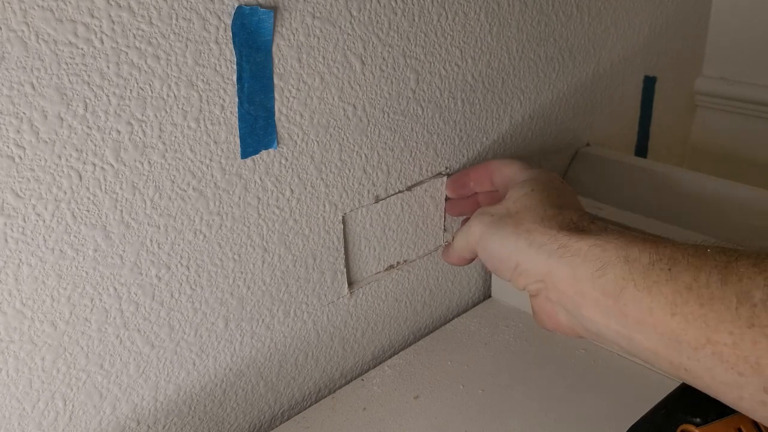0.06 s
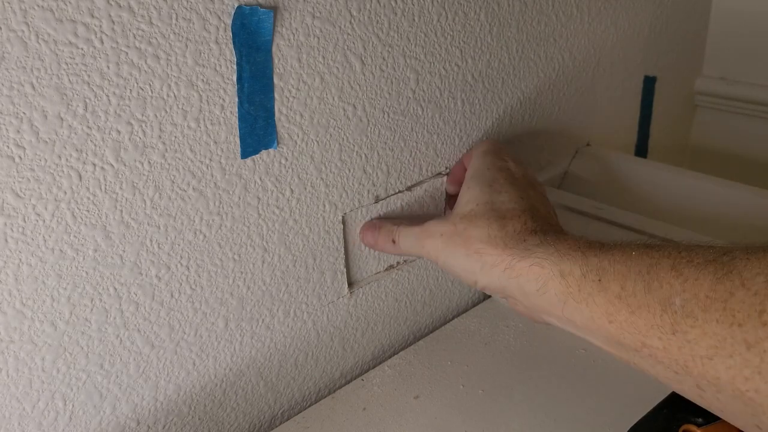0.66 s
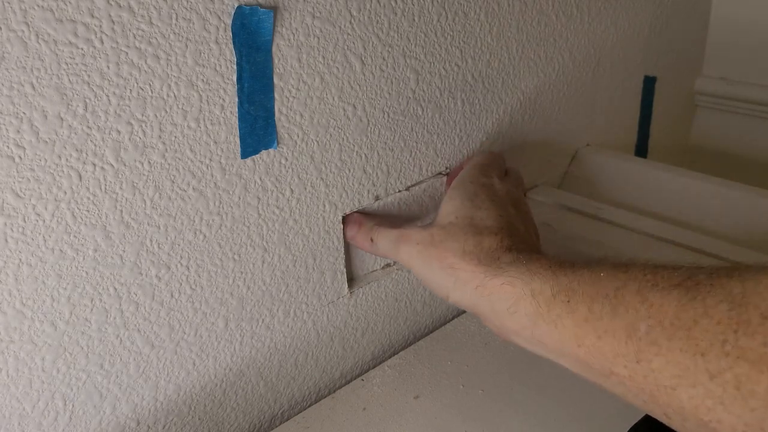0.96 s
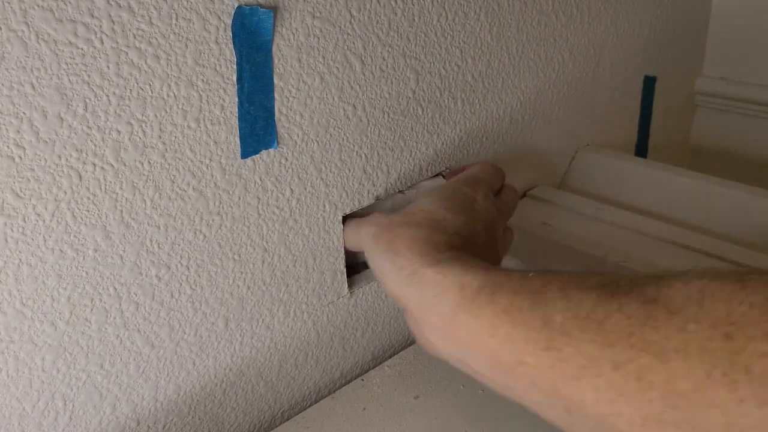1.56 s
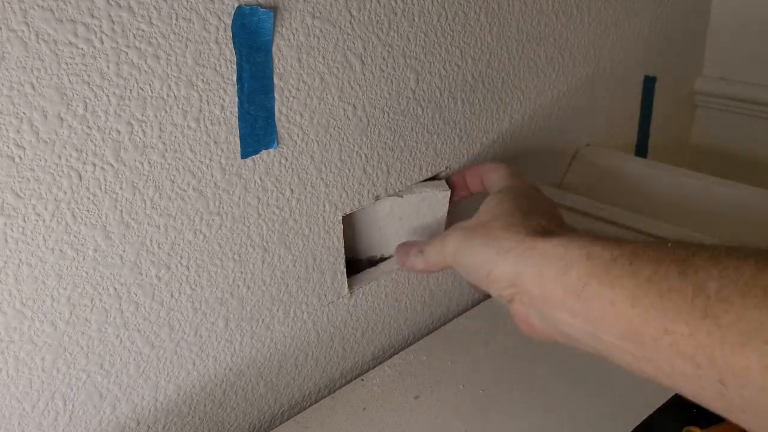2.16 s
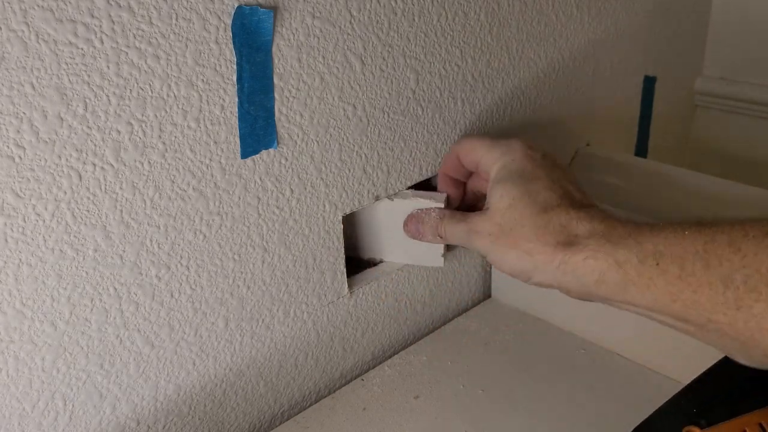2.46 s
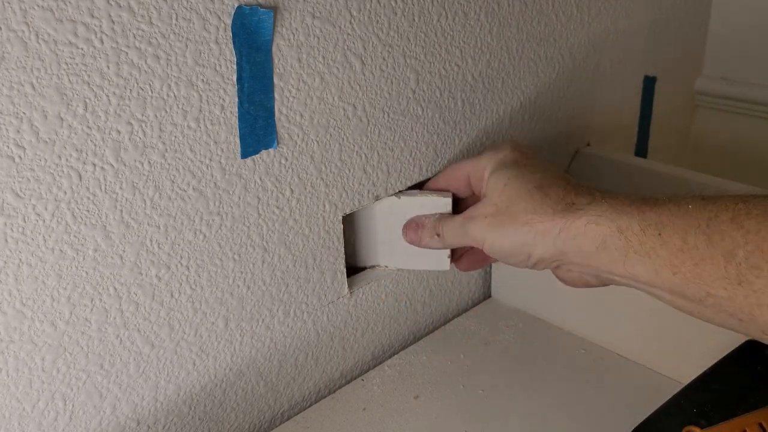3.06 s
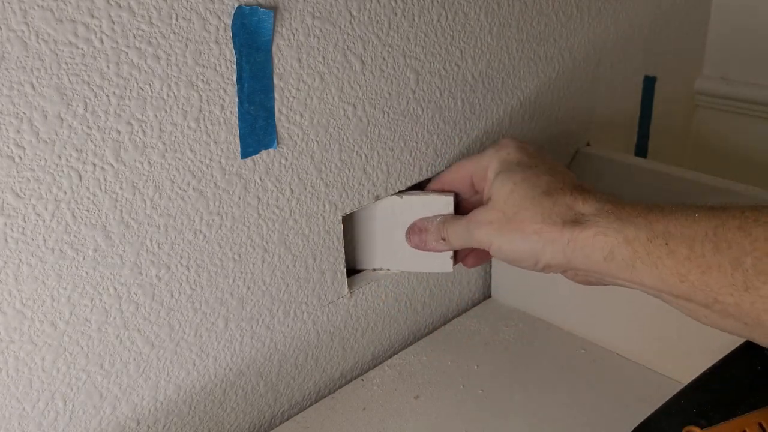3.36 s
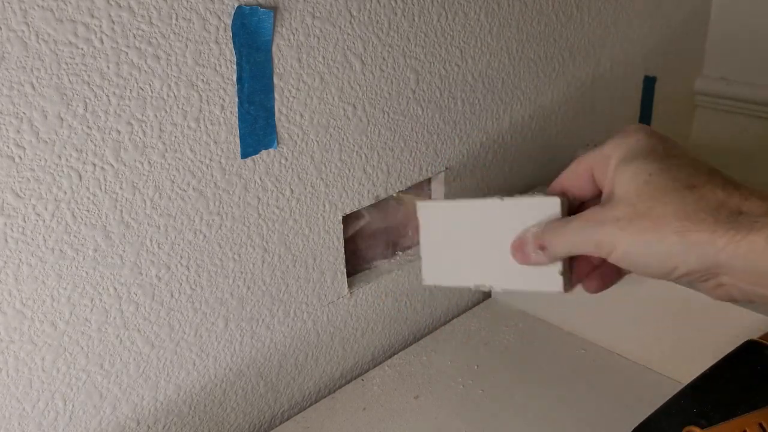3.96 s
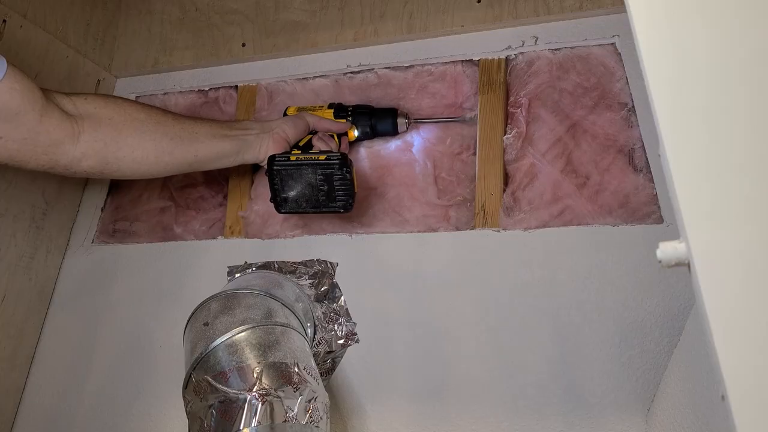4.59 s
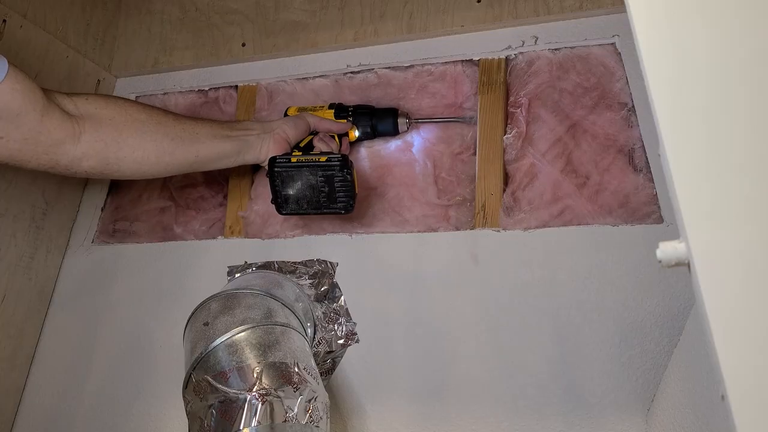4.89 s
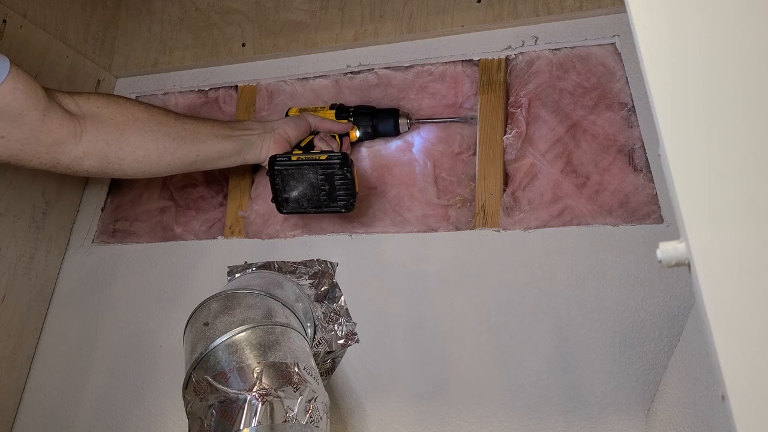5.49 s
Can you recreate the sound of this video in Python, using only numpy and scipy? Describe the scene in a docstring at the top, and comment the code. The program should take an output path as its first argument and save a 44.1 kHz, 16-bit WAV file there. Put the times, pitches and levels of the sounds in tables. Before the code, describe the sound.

Heard up close in a small room, a piece of drywall is worked out of a hollow wall. Soft, dull finger pats come first, then irregular knocks, gritty scrapes and bright ticks of breaking crumbs over a faint mains hum. The loosened piece drags out with a last, lighter scrape. The sound then switches abruptly to a cordless drill running quietly, with whining gears and rushing air.

```python
"""A small room with a faint mains hum, a stereo microphone close to a hollow wall. Fingertips pat and rub a cut
piece of drywall. From 1 s it is rocked and pried by hand: it knocks on the rim of its hole, and its gypsum
edges scrape, crunch and shed crumbs. At 2.7 s it comes loose and sounds lighter, then slides free. At 4.4 s the
scene changes and the hum stops: a cordless drill runs, quiet, steady and dry: whining gears, a shuddering chuck
and rushing cooling air."""
import sys
import numpy as np
from scipy import signal
from scipy.fft import rfft, irfft, next_fast_len
from scipy.io import wavfile
from scipy.ndimage import map_coordinates

SR = 44100
rng = np.random.default_rng(int(sys.argv[2]) if len(sys.argv) > 2 else 0)


def persist_wave(psi):
    """Save psi, clipped to +-1, as 16-bit WAV."""
    counts = np.round(np.clip(psi, -1, 1) * 32767).astype(np.int16)
    wavfile.write(sys.argv[1], SR, np.atleast_2d(counts).T)


N = 244114

MAINS_HUM = [(59.2, -55), (118.5, -77.5), (237, -76)]  # partials of the hum: f/Hz, level/dB
ROOM_AIR = [(20, -20.5), (65, -5), (110, -10.5), (220, -14.5), (400, -24.5), (1200, -29), (2200, -38.5),
            (4000, -42), (8000, -55.5), (15000, -56)]  # spectrum of the quiet room: f/Hz, level/dB
COHERENCE = [(150, 0.93), (550, 0.68), (5000, 0), (15000, 0)]  # diffuse sound at the microphone: f/Hz, left-right likeness/0..1
FINGER_TAPS = [(0.004, -41, 285), (0.077, -40, 316), (0.233, -38.5, 253), (0.295, -40, 295),
               (0.448, -43.5, 288), (0.508, -46, 207), (0.588, -41, 239)]  # fingertips pat the piece: t/s, level/dB, ring f/Hz
FINGER_RUBS = [(0.672, 0.025, -65), (0.748, 0.037, -62), (0.822, .036, -69.5), (0.934, 0.052, -66.5),
               (1.277, 0.036, -59), (1.335, 0.083, -65.5), (1.418, 0.32, -63), (1.748, 0.087, -52),
               (1.977, 0.049, -59), (3.156, 0.078, -65), (3.408, 0.038, -51.5)]  # skin slides on the paper face: t/s, length/s, level/dB
# balance of a tap and of a rub: wall/dB, board/dB, edge/dB, powder/dB
TAP_BALANCE = (-6.5, -13.5, -24, -40)
RUB_BALANCE = (0, 1.5, 0.5, -1.5)
# the piece hits the rim: t/s, level/dB, relative thud/dB, relative crunch/dB, ring f/Hz
RIM_KNOCKS = [(0.997, -26, -9, -7, 585), (1.015, -18.5, -5, -7, 326), (1.125, -40, 1, -12, 450),
              (1.231, -45, 8, -39, 304), (1.532, -25.5, -8.5, -6.5, 1113), (1.591, -25.5, -2, -15, 457),
              (1.798, -31, 7.5, -8, 182), (2.032, -28, 9.5, -13, 313), (2.123, -37, 12, -3, 110.4),
              (2.181, -31, 7, -29, 129), (2.225, -37.5, 9, -26, 207), (2.479, -21.5, -6, -11, 624),
              (2.868, -32.5, 14.5, -17.5, 310), (3.279, -37, 1, -2.5, 954), (3.299, -30.5, 0.5, -4.5, 287),
              (3.76, -27.5, -7, -10, 618), (3.941, -32.5, 1, -4, 139)]
EDGE_SCRAPES = [(1.016, 0.061, -43, -2.5), (1.614, 0.068, -31.5, -1.5), (2.107, 0.028, -39, -5.5),
                (2.158, 0.039, -30, -14.5), (2.448, 0.068, -39.5, -4.5), (2.565, 0.045, -43, -4),
                (2.652, 0.041, -39, -8), (2.834, 0.14, -42, -6), (3.026, 0.032, -45, -7),
                (3.489, 0.038, -49, -6.5), (3.561, 0.14, -43, -7), (3.725, 0.257, -40.5, -2.5),
                (3.749, .056, -23, -11.5), (3.974, 0.1, -49, -1), (4.081, 0.057, -38, 0.5)]  # the edge drags: t/s, length/s, level/dB, relative crunch/dB
CRUMB_SNAPS = [(1.0632, -33), (1.6365, -18), (1.7515, -32), (3.218, -60), (3.4285, -36), (4.026, -30.5)]  # single gypsum crumbs break: t/s, level/dB
# resonances of the hollow wall, the cut board and its gypsum edge: f/Hz, width/Hz, level/dB
WALL_MODES = [(57.3, 22, -2), (83, 29, 3), (134, 40, -3.5), (193, 67, -2), (245, 67, 3), (298, 31, -0.5)]
BOARD_MODES = [(406, 77, -1), (513, 70, 0), (647, 77, 1.5), (860, 51, -3), (1010, 61, 0), (1166, 90, -2),
               (1298, 113, -4.5)]
EDGE_MODES = [(1697, 334, -1), (2310, 153, -1), (2424, 144, 0.5), (2730, 225, 0), (3100, 218, -2),
              (3860, 260, -5)]
POWDER_HISS = [(1500, -39), (3500, 0), (4500, 0.5), (5600, 0.5), (7400, -1), (9000, -10), (12000, -7),
               (15500, -10)]  # spectrum of gypsum powder: f/Hz, level/dB
LOOSE_COLOUR = [(70, -6.5), (130, -2), (270, -0.5), (390, -4), (600, 1.05), (1500, -0.5)]  # the freed piece drives the deepest modes less: f/Hz, gain/dB
ROOM_DECAY = [(80, 0.52), (400, 0.63), (1300, 0.59), (4000, 0.58), (12000, 0.3)]  # reverberation time: f/Hz, t60/s
ROOM_COLOUR = [(30, -10), (90, 4), (250, -0.5), (450, -2), (1300, -2), (2500, -1.5), (8000, -1.5)]  # colour of the room's ring: f/Hz, gain/dB
SIDE_COLOUR = [(80, -21.5), (700, -7), (2400, 0), (9000, 0)]  # side signal at the microphone: f/Hz, gain/dB
WHINE_PITCH = [(4.44, 2560), (4.5, 2504), (4.6, 2545), (4.72, 2522), (4.92, 2531), (5.1, 2630),
               (5.25, 2683), (5.4, 2628), (5.54, 2618)]  # tooth rate of the drill's gears: t/s, f/Hz
DRILL_LEVELS = [(4.47, -48, -48, -55.5), (4.9, -51.5, -48.5, -55), (5.15, -58, -49, -59),
                (5.535, -51, -49, -58)]  # the drill's three layers: t/s, shudder/dB, rush/dB, whine/dB
GEAR_ORDERS = [(5, -7.5), (7, 1.5), (11, -4.5), (12, -3), (23, -10.5)]  # partials of the whine: motor order, level/dB
CHUCK_ORDERS = [(2, 6.5), (3, 6.5), (4, 5.5), (5, -0.5), (6, -2.5)]  # partials of the shudder: chuck order, level/dB
VENT_AIR = [(40, -12), (80, -11), (330, -3.5), (600, -9.5), (900, -10), (1500, -15.5), (2800, -17.5),
            (4400, -18.5), (8500, -24), (15800, -32.5)]  # spectrum of the cooling air: f/Hz, level/dB
CASE_MODES = [(740, 52, 3.5), (873, 58, 5), (1085, 40, 4.5), (4120, 810, -15), (8260, 980, -23)]  # resonances of the drill's case: f/Hz, width/Hz, level/dB

LOOSE_S, DRILL_ON_S = 2.7, 4.438
LEAD_S = 0.015  # a contact creeps in this long before it takes hold
ATTACK_S, RELEASE_S, SWELL_DB = 0.016, 0.017, -1  # pressure of a stroke: onset, release, change along it
CAVITY_DB, CAVITY_T60_S = -6, 0.16
POWDER_PER_CRUNCH = 1.56  # dB per dB: the hiss of powder grows faster than the crunch
KNOCK_POWDER_DB, SCRAPE_POWDER_DB, SCRAPE_THUD_DB = -5, -1.5, 0.5  # relative to the contact's level
BAND_LIMIT_HZ = 15950


def amp(db):
    """Decibels to gain."""
    return 10 ** (np.asarray(db) / 20)


def unit(x):
    """x scaled to rms 1."""
    return x / np.sqrt(np.mean(x ** 2) + 1e-20)


def along(points, hz):
    """(f/Hz, value) points interpolated on a log frequency axis."""
    freqs, values = np.transpose(points)
    return np.interp(np.log(hz + 1), np.log(freqs + 1), values)


def curves(rows):
    """One value per sample for each column after the time."""
    times, *columns = np.transpose(rows)
    return [np.interp(np.arange(N) / SR, times, column) for column in columns]


def wobble(rate, size=N):
    """A smooth random curve, rate knots a second."""
    knots = rng.standard_normal(int(size * rate / SR) + 4)
    return map_coordinates(knots, [np.arange(size) * rate / SR])


def add(track, start, sound):
    """Mix a sound in at start seconds."""
    part = track[max(round(start * SR), 0):][:len(sound)]
    part += sound[:len(part)]


def filtered(x, response):
    """x through a complex frequency response."""
    size = x.shape[-1]
    padded = next_fast_len(size + SR // 10)
    hz = np.fft.rfftfreq(padded, 1 / SR)
    return irfft(rfft(x, padded) * response(hz), padded)[..., :size]


def colour(x, spectrum):
    """x shaped by a smooth (f/Hz, gain/dB) curve."""
    return filtered(x, lambda hz: amp(along(spectrum, hz)))


def resonate(x, modes):
    """x through a bank of resonances with steep skirts and alternating signs."""
    def peak(hz, centre, width):
        return 1j * hz * width / (centre ** 2 - hz ** 2 + 1j * hz * width)
    return filtered(x, lambda hz: sum(
        (-1) ** k * amp(db) * peak(hz, centre, width) * peak(hz, centre, centre)
        for k, (centre, width, db) in enumerate(modes)))


def diffuse_noise():
    """White noise from all around the microphone: left and right alike in the bass only."""
    def mid_side_gains(hz):
        angle = np.arccos(np.clip(along(COHERENCE, hz), -1, 1)) / 2
        return np.array([np.cos(angle), np.sin(angle)])
    mid, side = filtered(rng.standard_normal((2, N)), mid_side_gains)
    return np.array([mid + side, mid - side])


def room_tone():
    """Mains hum in the centre, over faint air noise."""
    t = np.arange(N) / SR
    hum = sum(amp(db + .8 * wobble(4)) * np.sqrt(2) * np.sin(2 * np.pi * hz * t) for hz, db in MAINS_HUM)
    return hum + amp(-58) * unit(colour(diffuse_noise(), ROOM_AIR))


def grit(t, rate, spread_db):
    """Random tiny fractures, rate a second, of uneven size."""
    breaks = rng.random(len(t)) < rate / SR
    return unit(breaks * rng.standard_normal(len(t)) * amp(spread_db * rng.standard_normal(len(t))))


def blow(ring_hz, chatter_t60, chatter=0.29, ring=0.094, ring_t60=0.043, rise_s=0.016):
    """The edge starts to crumble, gives with one push and chatters on; the wedged piece rings."""
    t = np.arange(-round(LEAD_S * SR), SR // 4) / SR
    after = np.maximum(t, 0)
    envelope = amp(-60 * np.maximum(t / chatter_t60, -t / rise_s))
    crumbling = chatter * grit(t, rate=7000, spread_db=1.0) * envelope
    push = t == 0
    ringing = ring * np.sin(2 * np.pi * ring_hz * after) * amp(-60 * after / ring_t60)
    return crumbling + push + ringing


def scatter(x, size=1024, t60=0.017):
    """x through short, dense reflections that change from moment to moment."""
    out = np.zeros(len(x))
    window = signal.get_window("hann", size) ** .5
    for i in range(0, len(x) - size, size // 2):
        ring = rng.standard_normal(size) * amp(-60 * np.arange(size) / SR / t60)
        add(out, i / SR, signal.fftconvolve(x[i:i + size] * window, ring / np.linalg.norm(ring)))
    return out


def cavity(force):
    """A push on the wall and its boom in the hollow behind."""
    t = np.arange(len(force)) / SR
    boom = rng.standard_normal(len(t)) * amp(-60 * t / CAVITY_T60_S)
    return force + amp(CAVITY_DB) * signal.fftconvolve(force, boom / np.linalg.norm(boom))[:len(t)]


def drywall(force, levels_db, seconds):
    """A force drives wall, board, edge and powder, each with the energy of its level held for seconds."""
    contact = force + 2.0 * scatter(force)  # the high modes change as the contact point moves
    wall = resonate(cavity(force), WALL_MODES)
    board = resonate(force, BOARD_MODES)
    edge = resonate(contact, EDGE_MODES)
    powder = colour(contact, POWDER_HISS)
    parts = zip(levels_db, (wall, board, edge, powder))
    return sum(amp(db) * part / np.linalg.norm(part) for db, part in parts) * np.sqrt(seconds * SR)


def taps():
    """Soft fingertips give dull, light pats."""
    out = np.zeros(N)
    for start, db, ring_hz in FINGER_TAPS:
        force = blow(ring_hz, chatter_t60=0.058, ring=0.26)
        add(out, start - LEAD_S, drywall(force, db + np.array(TAP_BALANCE), seconds=0.014))
    return out


def stroke(length, levels_db, slip_db):
    """Pressure comes on, sags and lets go; the contact sticks and slips, shearing off grains in clumps."""
    t = np.arange(-round(LEAD_S * SR), int((length + RELEASE_S + .2) * SR)) / SR
    attack = .5 + .5 * np.tanh(2 * t / ATTACK_S - 1)
    release = np.clip((length - t) / RELEASE_S + .5, 0, 1)
    pressure = attack * release * amp(SWELL_DB * (t / length - .5))
    slips = amp(slip_db * wobble(190, size=len(t)))
    grains = grit(t, rate=7000, spread_db=3) + 0.82 * rng.standard_normal(len(t))
    return drywall(pressure * slips * grains, levels_db, seconds=np.sum(pressure ** 2) / SR)


def rubs():
    """The fingers shift their grip on the paper face: a thin, light hiss."""
    out = np.zeros(N)
    for start, length, db in FINGER_RUBS:
        add(out, start - LEAD_S, stroke(length, db + np.array(RUB_BALANCE), slip_db=0.9))
    return out


def knocks():
    """The piece tips and strikes the rim of the hole."""
    out = np.zeros(N)
    for start, db, thud_db, crunch_db, ring_hz in RIM_KNOCKS:
        balance_db = np.array([thud_db, 0, crunch_db, KNOCK_POWDER_DB + POWDER_PER_CRUNCH * crunch_db])
        force = blow(ring_hz, chatter_t60=0.064)
        add(out, start - LEAD_S, drywall(force, db + balance_db, seconds=0.013))
    return out


def scrapes():
    """The gypsum edge grinds along the cut, shaking board and wall."""
    out = np.zeros(N)
    for start, length, db, crunch_db in EDGE_SCRAPES:
        powder_db = SCRAPE_POWDER_DB + POWDER_PER_CRUNCH * crunch_db
        balance_db = np.array([SCRAPE_THUD_DB, 0, crunch_db, powder_db])
        add(out, start - LEAD_S, stroke(length, db + balance_db, slip_db=1.0))
    return out


def crumbs():
    """Breaking crumbs tick brightly, too light to move the wall."""
    out = np.zeros(N)
    t = np.arange(SR // 20) / SR
    for start, db in CRUMB_SNAPS:
        hiss = unit(colour(rng.standard_normal(len(t)), POWDER_HISS))
        add(out, start, amp(db - 4) * hiss * amp(-60 * t / 0.018))
    return out


def prying():
    """All contacts of the piece: deep while it is wedged in the wall, lighter once it is loose."""
    wedged = knocks() + taps() + crumbs() + scrapes() + rubs()
    loose = np.clip((np.arange(N) / SR - LOOSE_S) / 0.05, 0, 1)
    return (1 - loose) * wedged + loose * colour(wedged, LOOSE_COLOUR)


def blurred(x, split_hz=1400):
    """The room hears the board from all sides, so its resonances blur, the high ones most."""
    low = filtered(x, lambda hz: 1 / (1 + (hz / split_hz) ** 8))
    return low * unit(wobble(250)) + (x - low) * unit(wobble(1800))


def reverb(x, delay_s):
    """x through the room's diffuse tail, of energy 1, whose bands die at their own speeds."""
    hz, t, bands = signal.stft(rng.standard_normal(SR * 3 // 4), SR, nperseg=256)
    decay = amp(-60 * t / along(ROOM_DECAY, hz)[:, None])
    _, tail = signal.istft(bands * decay, SR, nperseg=256)
    response = np.pad(tail / np.linalg.norm(tail), (int(delay_s * SR), 0))
    return signal.fftconvolve(x, response)[:N]


def room(x, wet_db=-14):
    """Close, direct sound; the near wall and moving hand spread the treble sideways; the room rings on."""
    ringing = amp(wet_db) * colour(blurred(x), ROOM_COLOUR)
    mid = x + reverb(ringing, delay_s=0.012)
    side = colour(scatter(x) + reverb(ringing, delay_s=0.075), SIDE_COLOUR)
    return np.array([mid + side, mid - side]) * amp([[.6], [-.6]])  # slightly left of centre


def shaft(turns, orders, flutter_db, blur=0.0039):
    """Fluttering partials of a turning shaft, in stereo; the high ones blur most."""
    out = np.zeros((2, N))
    for order, db in orders:
        flutter = flutter_db * np.array([wobble(30), wobble(30)])
        phase = 2 * np.pi * order * turns + 2 * wobble(5) + blur * order ** 2 * wobble(200)
        out += amp(db + flutter) * np.sin(phase)
    return unit(out)


def drill(case_db=-3):
    """The motor whines through its gears, the chuck shudders, and cooling air rushes through the case."""
    whine_hz, = curves(WHINE_PITCH)
    shudder_db, rush_db, whine_db = curves(DRILL_LEVELS)
    teeth_passed = np.cumsum(whine_hz * (1 + .006 * wobble(220))) / SR
    motor_turns, chuck_turns = teeth_passed / 7, teeth_passed / 61.7
    roughness = unit(1 + .5 * wobble(260))
    whine = amp(whine_db) * roughness * shaft(motor_turns, GEAR_ORDERS, flutter_db=1.5)
    shudder = amp(shudder_db) * shaft(chuck_turns, CHUCK_ORDERS, flutter_db=1.0)
    vents = unit(colour(diffuse_noise(), VENT_AIR))
    case = amp(case_db) * unit(resonate(diffuse_noise(), CASE_MODES))
    pulsing = 1 + 0.058 * np.sin(2 * np.pi * chuck_turns)
    return whine + shudder + amp(rush_db) * (vents + case) * pulsing


def scene():
    """At the microphone: drywall over room tone; then the scene changes, the room tone stops and a drill runs."""
    drilling = np.clip((np.arange(N) / SR - DRILL_ON_S) / 0.011, 0, 1)
    return room(prying()) + (1 - drilling) * room_tone() + drilling * drill()


def record(dry):
    """The camera keeps nothing above its band limit."""
    return filtered(dry, lambda hz: np.clip((BAND_LIMIT_HZ - hz) / 250 + .5, 0, 1))


dry = scene()
out = record(dry)
persist_wave(out)
```